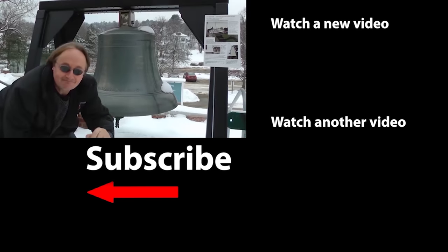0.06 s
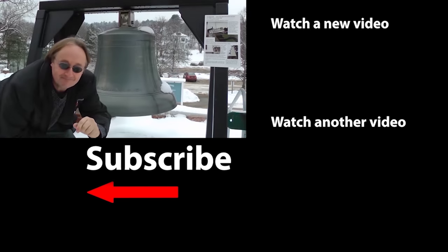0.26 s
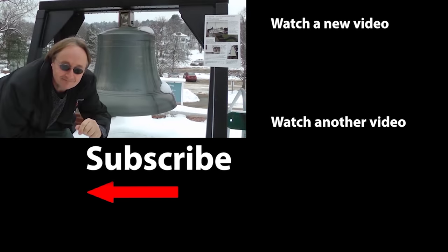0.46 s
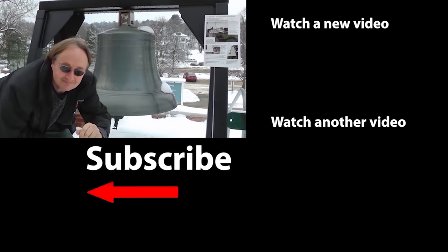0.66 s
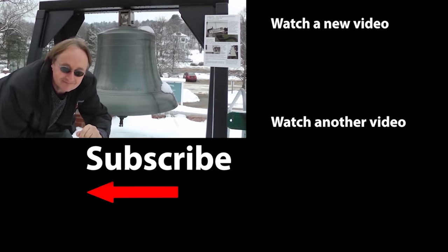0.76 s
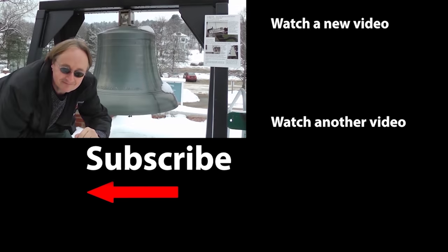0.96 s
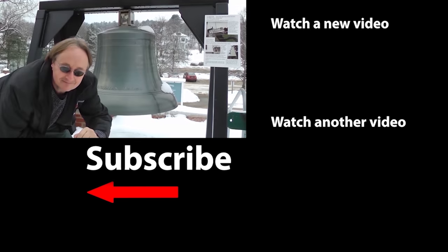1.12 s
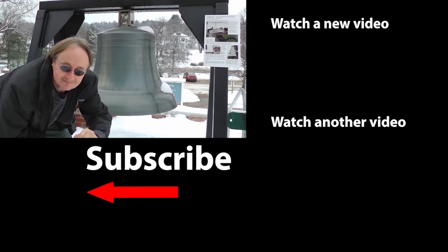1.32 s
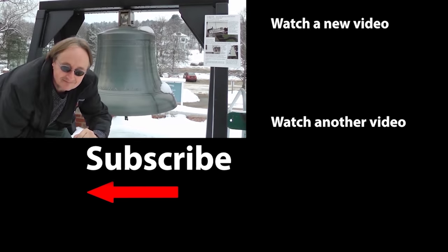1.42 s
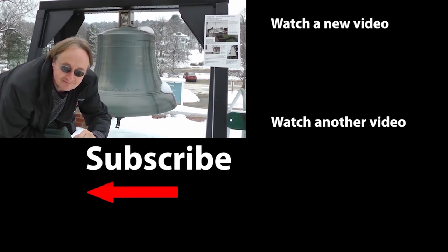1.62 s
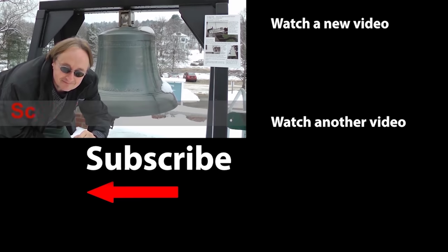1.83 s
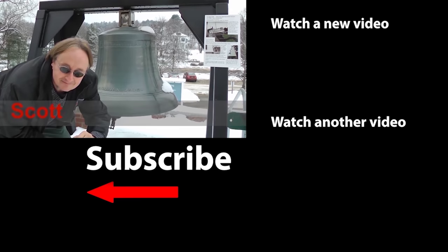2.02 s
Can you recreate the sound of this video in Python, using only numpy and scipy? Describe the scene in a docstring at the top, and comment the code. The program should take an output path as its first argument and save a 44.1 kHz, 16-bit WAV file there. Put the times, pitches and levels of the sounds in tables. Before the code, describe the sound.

Close, loud ringing of a big bronze bell in open air, mellowing from metallic shimmer to deep wavering tones

```python
"""A large bronze bell, already struck, is heard ringing close by in the open air.
Its ring is additive: exponentially decaying sines, most of them beating pairs, over a wash of decaying noise.
The high partials die first, leaving the hum, prime and minor third, which beat slowly.
A limiter lets go as the bell fades, lifting the low partials and the noise-band background.
Puffs of wind, a faint harmonic squeak (perhaps the yoke), dull filtered ticks and fine crackle lie beneath."""
import sys
import numpy as np
from scipy import signal
from scipy.io import wavfile

SR = 44100
rng = np.random.default_rng(int(sys.argv[2]) if len(sys.argv) > 2 else 0)


def materialize(psi):
    """Save the field psi as 16-bit PCM at rate SR to the path in sys.argv[1].

    A 1-D psi becomes a single channel; in a 2-D psi each row is a channel.
    """
    bounded = np.clip(np.atleast_2d(psi).T, -1, 1)
    quanta = np.round(bounded * 32767).astype(np.int16)
    wavfile.write(sys.argv[1], SR, quanta)


N = 91772


def from_db(db):
    """Logarithmic level: decibels become an amplitude gain."""
    return 10 ** (np.asarray(db) / 20)


def pan(pan_db):
    """Intensity stereo: gains for left and right that differ by pan_db."""
    return from_db([[pan_db / 2], [-pan_db / 2]])


def rms_one(x):
    """Normalisation: scale to unit root-mean-square."""
    return x / np.sqrt(np.mean(x ** 2) + 1e-20)


def seconds():
    """Sampling: the time of every sample."""
    return np.arange(N) / SR


def at_hz(points, hz):
    """Interpolation of a curve along a logarithmic frequency axis."""
    points = np.array(points)
    return np.interp(np.log(hz), np.log(points[:, 0]), points[:, 1])


def drift(rate_hz):
    """Low-passed noise: a smooth random fluctuation of unit rms, from a double real pole at rate_hz."""
    step, warm_up = 100, 2000   # samples per point; points dropped while the filter settles
    pole = np.exp(-2 * np.pi * rate_hz * step / SR)
    white = rng.standard_normal(N // step + warm_up + 2)
    slow = rms_one(signal.lfilter([1], [1, -2 * pole, pole * pole], white))[warm_up:]
    return np.interp(np.arange(N) / step, np.arange(len(slow)), slow)


def band(x, low_hz, high_hz):
    """Band-pass filtering, Butterworth, second-order prototype."""
    sos = signal.butter(2, [low_hz, min(high_hz, SR / 2 - 1)], "band", fs=SR, output="sos")
    return signal.sosfilt(sos, x)


# Correlation of the noise between the two channels: frequency [Hz], likeness [0-1]
LIKENESS = [(40, 0.39), (90, 0.34), (200, 1), (500, 0.96), (1300, 0.7), (10000, .999)]


def banded_noise(spectrum, patchy_db, decay=None):
    """Subtractive synthesis: half-octave noise bands with their own level, flicker, correlation and decay."""
    edges = 20 * 2 ** np.arange(0, 10, .5)
    white = rng.standard_normal((2, 2, N + SR // 10))   # neighbouring bands take independent noise
    out = 0
    for k, (low, high) in enumerate(zip(edges, edges[1:])):
        mid, side = band(white[k % 2], low, high)[:, -N:]
        hz = np.sqrt(low * high)
        alike = at_hz(LIKENESS, hz)
        level_db = at_hz(spectrum, hz) + patchy_db * drift(6.9)
        if decay:
            level_db = level_db - at_hz(decay, hz) * seconds()
        stereo = np.sqrt(1 + alike) * mid + np.sqrt(1 - alike) * side * [[1], [-1]]
        out = out + from_db(level_db) * stereo
    return out * np.sqrt(SR) / 2   # makes the levels densities, dB per Hz


EAR_PHASE_RAD = 0.02   # phase difference of a partial between the channels
# Unsteadiness of a mode at 1 kHz, slow and fast; in dB it grows as the square root of frequency
WAVER_DB, WAVER_HZ = 0.64, 1.6
ROUGH_DB, ROUGH_HZ = 0.32, 60


def mode_pair(hz, level_db, decay, beat_hz, trough_s, twin):
    """Beating: a damped sine and its detuned twin interfere, cancelling most at the trough."""
    t = seconds()
    turn = rng.random()
    ear_phase = EAR_PHASE_RAD * rng.choice([-1, 1]) * np.array([[.5], [-.5]])
    phase = 2 * np.pi * (hz * t + turn) + ear_phase
    twin_phase = phase + 2 * np.pi * beat_hz * (t - trough_s)
    pair = np.sin(phase) - twin * np.sin(twin_phase)
    unsteady_db = np.sqrt(hz / 1000) * (WAVER_DB * drift(WAVER_HZ) + ROUGH_DB * drift(ROUGH_HZ))
    return np.sqrt(2) * from_db(level_db - decay * t + unsteady_db) * pair   # level is the sine's rms


# Main partials of the bell: pitch_hz [Hz], level_db [dB], decay [dB/s], beat_hz [Hz], trough_s [s],
# twin [share 0-1], pan_db [dB, left minus right]
PARTIALS = [(217.4,-36.5,1.26,.22,3.3,0.06,0.6),(416.9,-25.5,2.5,0.93,0.041,0.08,.5),(498.2,-26,1,0.19,1.54,0.37,-2.5),(825.4,-32,9,0.25,2,0.77,1.4),(1042,-32.5,55,6.1,0.05,0.7,-4),(1127.7,-36,16,.96,1.135,0.7,0.5),
            (1233.4,-23.4,12.6,0.64,1.283,0.95,0),
            (1520.6,-37,27.5,0.9,1.2,0.3,-2),(1699.2,-28,13.5,0.85,1.54,0.14,-0.84),(1917,-41.5,23.5,.95,1.8,0.01,2.5),(2212,-41,11,0.36,1.69,0.6,-.6),(2470,-49,18.5,0.86,1.2,0.7,3),(2756.3,-31,16.5,1.13,0.87,0.32,-0.5),(3328,-34.5,21,0.934,1.19,.55,0),(3913,-40,24.5,1.3,0.81,0.2,0),(4505.5,-54.5,23,1.6,0.24,1,-1.5),(5100,-49,24.5,1.5,0.86,0.15,-0.5)]


def main_partials():
    """Modal synthesis: each split mode of the bell is a beating, exponentially damped pair."""
    out = 0
    for hz, level_db, decay, beat_hz, trough_s, twin, pan_db in PARTIALS:
        out = out + mode_pair(hz, level_db, decay, beat_hz, trough_s, twin) * pan(pan_db)
    return out


# Weaker, short-lived overtones of the bell: pitch_hz [Hz], level_db [dB], decay [dB/s]
OVERTONES = [(932,-49,50.5),(1117.7,-44,17.5),(1181,-37.5,33.5),(1418,-43,21),(1496,-47,58.5),(1706,-37.5,47.5),(1860,-50,20),(1883,-48.5,33),(2187,-49,23.5),(2870,-59.5,24.5),(2846,-50.5,20),(2900,-47.5,41),(3640,-51.5,37),(4310,-55.5,37),(4680,-58.5,36.5),(5052,-52.5,42),(5440,-57.5,36),(5712,-53,28.5),(5850,-62,40),(6280,-59.5,25),(6374,-58.5,29.5),(6570,-65.5,46),(6630,-58.5,47),(6990,-60,29.5),(7111,-65,42.5),(7280,-57.5,41.5),(7280,-61.5,41),(7530,-58,32),(7607,-61,53.5),(8020,-64,37),(8040,-66.5,34),(8130,-67.5,35.5),(8500,-63.5,64.5),(8600,-66,53),(9200,-66,57.5),(9600,-66.5,58),(9921,-61,55),(10885,-65.5,50),(11940,-69.5,53)]
OVERTONE_MAX_BEAT_HZ, OVERTONE_TWIN = 1.3, 0.06


def overtones():
    """Modal damping: weak modes, mostly high and quickly damped, beat shallowly at random rates."""
    out = 0
    for hz, level_db, decay in OVERTONES:
        beat_hz, trough_s = OVERTONE_MAX_BEAT_HZ * rng.random(), rng.uniform(0, 1.8)
        out = out + mode_pair(hz, level_db, decay, beat_hz, trough_s, OVERTONE_TWIN)
    return out


# Starting spectrum of the countless faint modes: frequency [Hz], density [dB per Hz]
WASH = [(40, -77), (130, -77.5), (280, -79), (420, -68.5), (650, -80.5), (900, -77), (1250, -69.5),
        (2000, -81.5), (3000, -79.5), (4500, -90.5), (7000, -94.5), (10000, -103), (13000, -107)]
# Damping of the same modes: frequency [Hz], decay [dB/s]
WASH_DECAY = [(100, 12.5), (1000, 20.5), (3000, 18.5), (7000, 28.5), (13000, 36.5)]
CLASH_DB, CLASH_S = 0.5, 0.06   # extra level at the start and its time constant


def wash():
    """Modal density: faint modes too close to separate are heard as decaying noise."""
    clash_db = CLASH_DB * np.exp(-seconds() / CLASH_S)
    noise = banded_noise(WASH, patchy_db=-1.0, decay=WASH_DECAY)   # the sign only mirrors the flicker
    return noise * from_db(clash_db)


SHIMMER_LOW_HZ, SHIMMER_HIGH_HZ = 4850, 12830
SHIMMER_DB, SHIMMER_DB_PER_OCTAVE = -69, -6.5   # peak level at the low edge, and slope above it
SHIMMER_DECAY = 29   # dB/s


def shimmer(count=70):
    """Superposition of inharmonic modes: damped sines at chance pitches, weaker towards the top."""
    t, out = seconds(), 0
    for place, turn in rng.random((count, 2)):
        hz = SHIMMER_LOW_HZ + place * (SHIMMER_HIGH_HZ - SHIMMER_LOW_HZ)
        level_db = SHIMMER_DB + SHIMMER_DB_PER_OCTAVE * np.log2(hz / SHIMMER_LOW_HZ)
        out = out + from_db(level_db) * np.sin(2 * np.pi * (hz * t + turn))
    return out * from_db(-SHIMMER_DECAY * t)


# Spectrum of the outdoor background: frequency [Hz], density [dB per Hz]
AIR = [(25, -97), (70, -88.5), (130, -88), (280, -90), (450, -75), (700, -86), (950, -93), (1300, -90),
       (2000, -103), (3000, -109), (4500, -118), (7000, -123), (11000, -126), (13000, -135)]
AIR_PAN_DB = 5.5   # left minus right


def background():
    """Stationary coloured noise: the outdoor background, flickering slightly and stronger on the left."""
    return banded_noise(AIR, patchy_db=2.0) * pan(AIR_PAN_DB)


CRACKLE_PER_S, CRACKLE_BAND_HZ = 160, (2600, 6700)
CRACKLE_DB, CRACKLE_SPREAD_DB = -61, 1.4   # grain size before filtering, and its spread
GRAIN_DECAY_S = 0.00062


def crackle(x):
    """Amplitude-dependent shot noise: tiny rough grains, likeliest where the wave's size peaks."""
    crest = np.square(np.square(x.mean(axis=0)))
    born = rng.random(N) < CRACKLE_PER_S / SR * crest / crest.mean()
    sizes = from_db(CRACKLE_DB + CRACKLE_SPREAD_DB * np.clip(rng.standard_normal(N), -2, 2))
    pole = np.exp(-2 / (GRAIN_DECAY_S * SR))   # power falls twice as fast as amplitude
    power = signal.lfilter([1], [1, -pole], born * sizes ** 2 + 1e-18)
    return band(np.sqrt(power) * rng.standard_normal(N), *CRACKLE_BAND_HZ)


# Puffs of wind on the microphone: middle_s [s], width_s [s, standard deviation], level_db [dB before panning]
GUSTS = [(.24, 0.011, -58), (.31, 0.035, -53), (.39, 0.011, -54.5), (.5, .013, -53.5),
         (1.065, 0.014, -54.5), (1.14, .035, -55.5), (1.29, .01, -62)]
GUST_BAND_HZ, GUST_PAN_DB = (45, 98), 11


def gusts():
    """Turbulence noise: low rumble under Gaussian puffs, partly shared by the channels, stronger left."""
    own, shared = rng.standard_normal((2, N)), rng.standard_normal(N)
    rumble = rms_one(band(own + shared, *GUST_BAND_HZ)) * pan(GUST_PAN_DB)
    strength = 0
    for middle_s, width_s, level_db in GUSTS:
        puff = np.exp(-((seconds() - middle_s) / width_s) ** 2 / 2)
        strength = strength + from_db(level_db) * puff
    return rumble * strength


# Faint squeaks: middle_s [s], length_s [s], pitch_hz [Hz], level_db [dB]
SQUEAKS = [(0.983, 0.27, 726, -54.5), (1.087, 0.063, 720, -52.5), (1.18, 0.12, 720, -52.5),
           (1.319, 0.097, 737, -53), (1.808, 0.15, 715, -50.5), (2.064, 0.078, 719, -55.5)]
# Harmonics of a squeak from the fundamental up: level_db [dB relative to the squeak's level]
SQUEAK_HARMONICS_DB = [-0.5, -10, -18.5]
SQUEAK_JITTER = 0.0049   # rms pitch wander as a fraction of the pitch


def squeaks():
    """Harmonic series: three phase-locked harmonics of a slightly wandering pitch, in short swells."""
    out = 0
    for middle_s, length_s, hz, level_db in SQUEAKS:
        pitch_hz = hz * (1 + SQUEAK_JITTER * drift(23))
        phase = 2 * np.pi * np.cumsum(pitch_hz) / SR
        swell = np.exp(-(2 * (seconds() - middle_s) / length_s) ** 4)
        for k, harmonic_db in enumerate(SQUEAK_HARMONICS_DB):
            out = out + swell * from_db(level_db + harmonic_db) * np.sin((k + 1) * phase)
    return np.sqrt(2) * out


# Soft, dull ticks: start_s [s], peak_db [dB before the colour levels]
TICKS = [(1.057,-40.5),(1.096,-38),(1.154,-44),(1.168,-36.5),(1.193,-44),(1.228,-41),(1.278,-41),(1.315,-41),(1.389,-45.5),(1.425,-43),(1.439,-43),(1.536,-41),(1.55,-49),(1.586,-42),(1.697,-45),(1.806,-47),(1.842,-46),(1.856,-43.5),(1.954,-47),(1.968,-42),(2.018,-48.5),(2.042,-45)]
# A tick's body, then its bright edge: low_hz [Hz], high_hz [Hz], level_db [dB]
TICK_COLOUR = [(350, 900, 0.5), (3500, 8800, -18)]


def ticks():
    """Impulse response: each pulse excites a dull body and a faint bright edge."""
    clicks, out = np.zeros(N), 0
    for start_s, peak_db in TICKS:
        clicks[min(int(start_s * SR), N - 1)] = from_db(peak_db)
    for low_hz, high_hz, level_db in TICK_COLOUR:
        height = np.abs(band(signal.unit_impulse(SR // 10), low_hz, high_hz)).max()
        out = out + from_db(level_db) * band(clicks + 1e-18, low_hz, high_hz) / height
    return out


FLUTTER_DB, FLUTTER_HZ = 0.57, 23   # slight common flutter of the whole ring


def scene():
    """Linear superposition: the fluttering ring of the bell, the squeaks and the open air."""
    ring = wash() + main_partials() + overtones() + shimmer()
    ring = ring * from_db(FLUTTER_DB * drift(FLUTTER_HZ))
    return ring + squeaks() + gusts() + background()


CEILING_DB, RELEASE_DB_PER_S = -22, 22.5
ATTACK_S = 0.00052   # time constant that smooths the gain


def limiter(x):
    """Dynamic compression: gain ducks on crests above the ceiling and recovers linearly in decibels."""
    over = np.maximum(20 * np.log10(np.abs(x).max(axis=0) + 1e-9) - CEILING_DB, 0)
    over[0] = over[:SR // 15].max()   # already held down by the strike
    ramp = RELEASE_DB_PER_S * seconds()
    cut = np.maximum.accumulate(over + ramp) - ramp
    pole = np.exp(-1 / (ATTACK_S * SR))
    smooth_cut = cut[0] + signal.lfilter([1 - pole], [1, -pole], cut - cut[0])
    return x * from_db(-smooth_cut)


CUTOFF_HZ, END_FADE_S = 13600, .004


def record(dry):
    """Signal chain: limiting, added crackle and ticks, a short end fade and a steep low-pass."""
    held = limiter(dry)
    out = held + crackle(held) + ticks()
    out = out * np.minimum(seconds()[::-1] / END_FADE_S, 1)
    return signal.sosfilt(signal.cheby2(16, 70, CUTOFF_HZ, fs=SR, output="sos"), out)


dry = scene()
out = record(dry)
materialize(out)
```